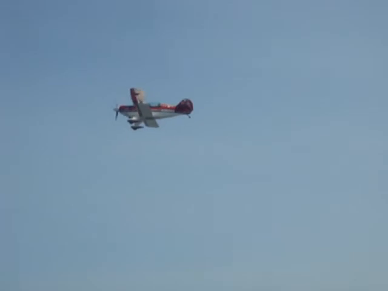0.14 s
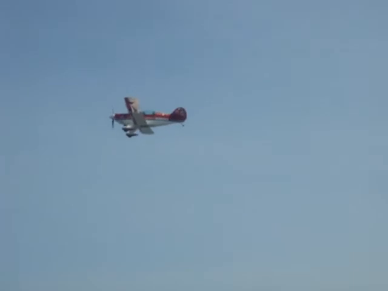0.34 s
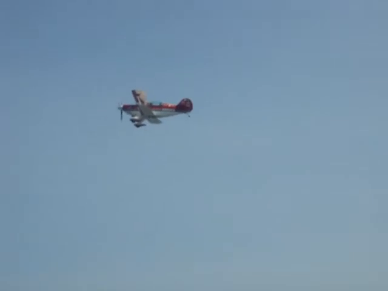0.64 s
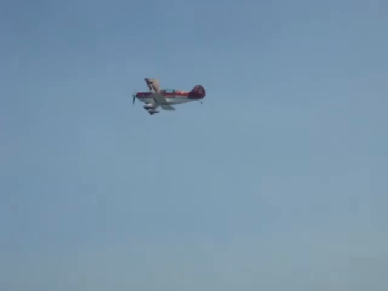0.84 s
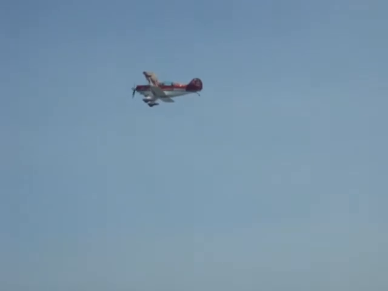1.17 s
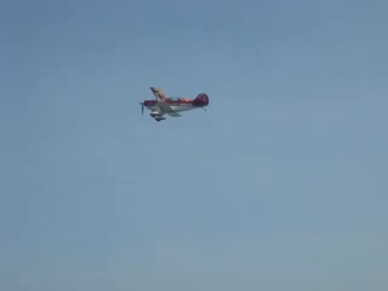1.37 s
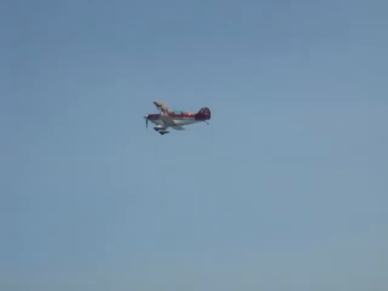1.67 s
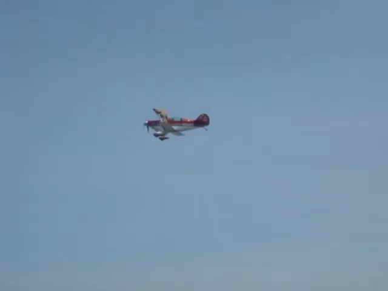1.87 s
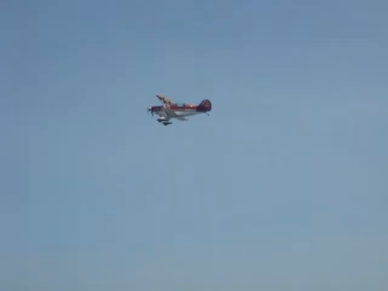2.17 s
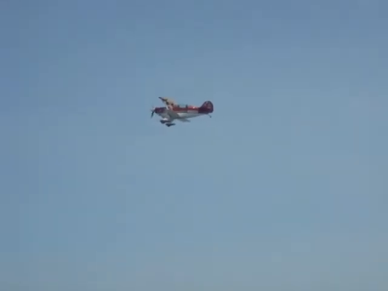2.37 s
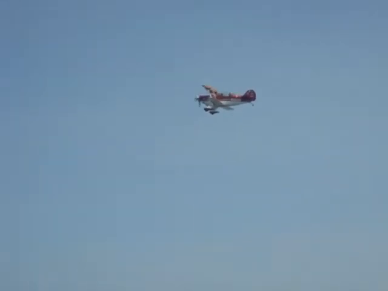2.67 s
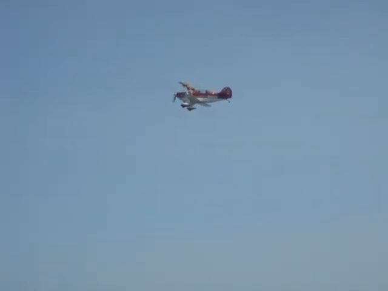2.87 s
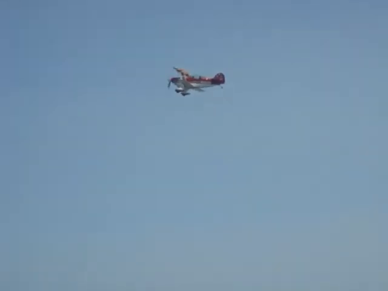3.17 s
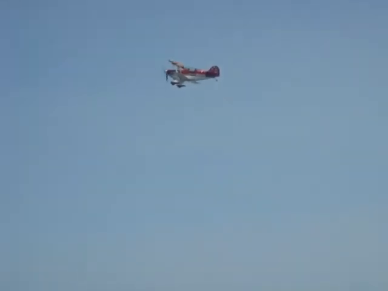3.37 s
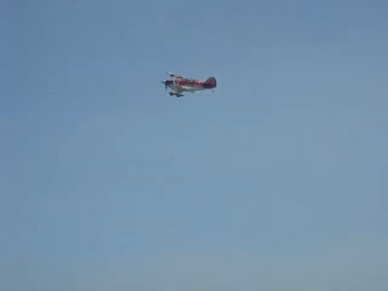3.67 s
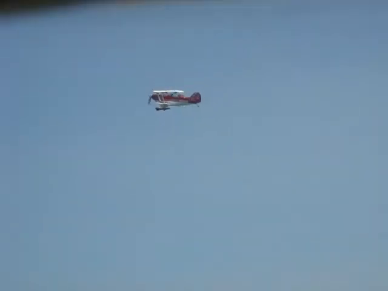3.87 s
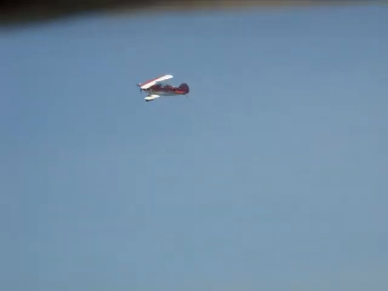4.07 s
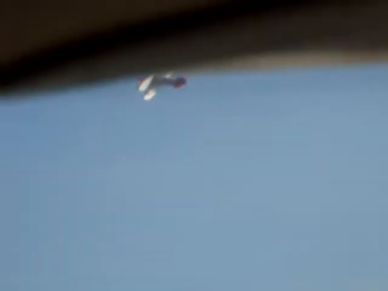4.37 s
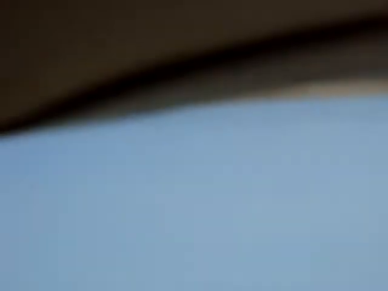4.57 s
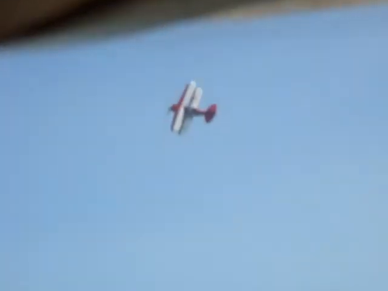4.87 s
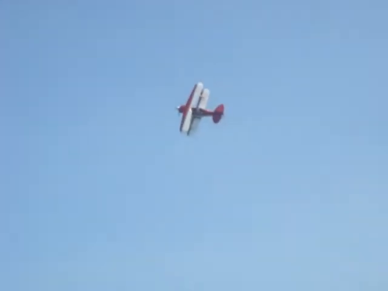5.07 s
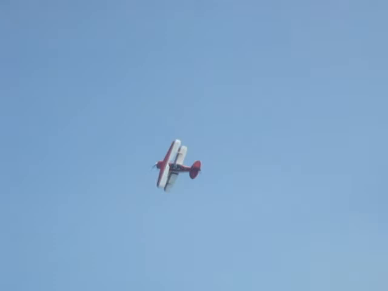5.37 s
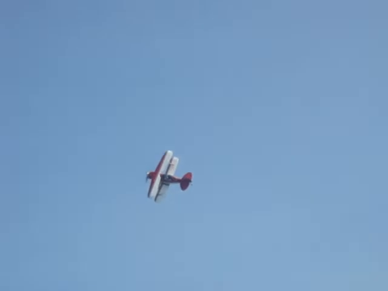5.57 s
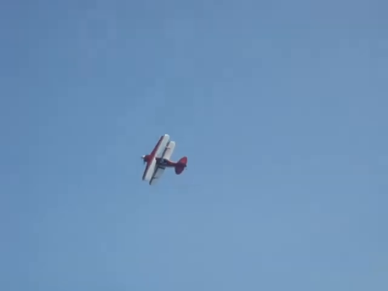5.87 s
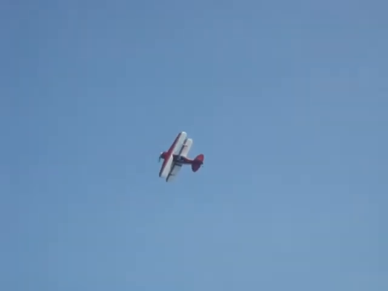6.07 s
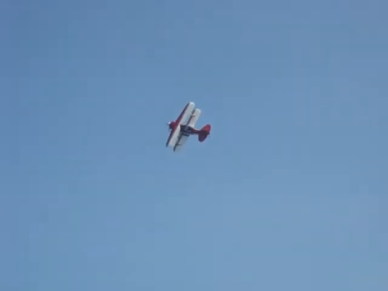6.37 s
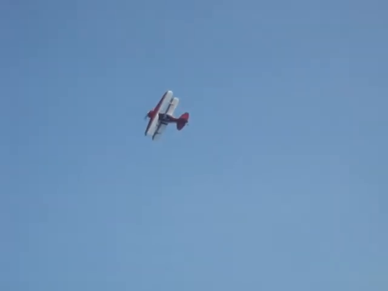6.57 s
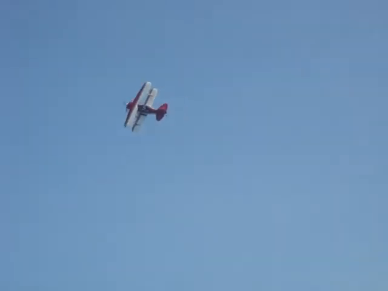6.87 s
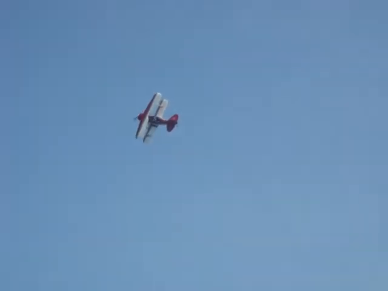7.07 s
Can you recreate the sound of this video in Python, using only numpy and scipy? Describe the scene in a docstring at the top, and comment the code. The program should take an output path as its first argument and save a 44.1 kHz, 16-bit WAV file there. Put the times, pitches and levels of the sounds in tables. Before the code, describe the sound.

Inside a light aircraft, a constant low engine buzz and propeller hum sit beneath loud hissing airflow, unbroken from start to finish.

```python
"""A four-cylinder engine and its propeller drone in the cockpit of a light aircraft in level flight.
The drone is a stack of steady tones tied to the engine speed; a low roar of shaped noise lies under it.
Air rushes loudly over the canopy: brighter noise, faintly pulsed by the propeller blades.
The microphone is moved about under the canopy, and turned after five seconds, which shifts the colour."""
import sys
import numpy as np
from scipy import signal
from scipy.fft import rfft, irfft
from scipy.io import wavfile

SR = 44100
rng = np.random.default_rng(int(sys.argv[2]) if len(sys.argv) > 2 else 0)


def transcribe(signal):
    """Save signal, clipped to [-1, 1], as a 16-bit WAV file at the path in sys.argv[1]."""
    frames = np.atleast_2d(signal).T
    limited = np.clip(frames, -1, 1)
    pcm = np.round(limited * 32767).astype(np.int16)
    wavfile.write(sys.argv[1], SR, pcm)


N = 318825

# the microphone is turned once away from the airflow, quickly at first and then ever more slowly
TURN_AT_S, TURN_SETTLE_S = 5.14, .36


def from_db(db):
    """Turns decibels into a gain."""
    return 10 ** (np.asarray(db) / 20)


def curve(rows, t):
    """Reads a table of (time_s, value) at the times t, joining its points by straight lines."""
    return np.interp(t, *np.transpose(rows))


def spectrum(points, hz):
    """Reads a table of (pitch_hz, level_db), joined by straight lines on a log-frequency axis."""
    point_hz, point_db = np.transpose(points)
    return np.interp(np.log(hz + 1), np.log(point_hz + 1), point_db)


def unit(x):
    """Scales a signal to an rms (average strength) of 1."""
    return x / np.sqrt(np.mean(x ** 2) + 1e-20)


def wander(t, rate_hz):
    """Slow random drift of rms 1, with little movement faster than the rate."""
    grid_s = np.arange(4096) / 400  # 400 points a second
    hz = np.fft.rfftfreq(len(grid_s), grid_s[1])
    noise_spectrum = rfft(rng.standard_normal(len(grid_s)))
    # weaken the fast movement and remove the constant part
    slow = irfft(noise_spectrum / (1 + (hz / rate_hz) ** 4) * (hz > 0))
    return np.interp(t, grid_s, unit(slow))


def shaped_noise(colour):
    """Noise whose level in dB per Hz is colour(hz, s), set in short overlapping slices of time."""
    hz, s, slices = signal.stft(rng.standard_normal(N), SR, nperseg=2048, noverlap=1536)
    # the square root makes 0 dB mean a power of 1 per Hz
    slices = slices * from_db(colour(hz[:, None], s)) * np.sqrt(SR / 2)
    _, noise = signal.istft(slices, SR, nperseg=2048, noverlap=1536)
    return noise[:N]


def bell(x, centre, width):
    """A smooth peak of height 1."""
    return np.exp(-.5 * ((x - centre) / width) ** 2)


def crossover_db(ratio):
    """A steep slope that cuts the level as the ratio passes 1."""
    return -10 * np.log10(1 + ratio ** 16)


def engine_cycles(t, start_firing_hz=86.37, sag_hz_per_s=.07, jitter=.0003):
    """Running count of engine cycles; speed sags very slightly and uneven combustion makes it tremble."""
    firing_hz = start_firing_hz - sag_hz_per_s * t
    cycle_hz = firing_hz / 4  # four firings make one engine cycle
    return np.cumsum(cycle_hz * (1 + jitter * wander(t, rate_hz=6))) / SR


def standing_db(hz, s):
    """Moving through the cockpit's standing waves lifts some bands and lowers others."""
    # place of the microphone across the cockpit: (time_s, place from about -1 to 1)
    mic_place = [(0, -.35), (1.2, -0.73), (3, -0.35), (3.4, .35), (5, 0.23), (5.8, 1)]
    # standing waves of the cockpit: (pitch_hz, width_hz, gain_db per unit of place)
    standing_waves = [(85, 25, -1.5), (345, 25, 1), (550, 50, -0.3), (767, 71, 3)]
    bands_db = sum(db * bell(hz, centre_hz, width_hz) for centre_hz, width_hz, db in standing_waves)
    return curve(mic_place, s) * bands_db


def drone(t, cycles, level_db=0, firing_waver_db=.5, uneven_waver_db=1.3, upper_db=-47, upper_fall_db=0.3):
    """Firing and blade harmonics, with lines between them because the cylinders differ."""
    # exhaust and propeller tones before waver and standing waves: (multiple of cycle rate, level_db rms)
    # every fourth multiple is a firing and blade harmonic
    engine_lines = [(4, -41), (5, -47.2), (6, -44.8), (8, -28.2), (9, -37), (10, -45), (11, -47),
                    (12, -33.6), (13, -39.7), (14, -41.4), (15, -40.7), (16, -33.8), (17, -43.8),
                    (18, -35.6), (19, -46.7), (20, -37.3), (22, -46.8), (23, -46), (24, -35), (25, -41.2),
                    (26, -34.5), (27, -42.4), (28, -40), (29, -46), (30, -43.2), (31, -43), (32, -38),
                    (33, -38), (34, -41.5), (35, -40), (36, -39.5), (37, -35), (39, -45.5), (40, -42.5)]
    # higher crankshaft harmonics sink into the rush
    upper_lines = [(order, upper_db - upper_fall_db * (order - 42)) for order in range(42, 66, 2)]
    tones = np.zeros(N)
    for order, db in engine_lines + upper_lines:
        is_firing = order % 4 == 0
        mean_hz = order * cycles[-1] / t[-1]
        waver_db = (firing_waver_db if is_firing else uneven_waver_db) * wander(t, rate_hz=3.1)
        gain = from_db(db + waver_db + standing_db(mean_hz, t))
        # reflections in the cockpit scatter the phases, smearing the firings into a drone
        random_phase = rng.random()
        tones += gain * np.cos(2 * np.pi * (order * cycles + random_phase))
    return np.sqrt(2) * from_db(level_db) * tones  # the root of 2 turns rms into peak height


def roar(top_hz=950, standing_share=.35, level_db=0):
    """Turbulence and combustion noise booming in the cockpit, feeling the standing waves only in part."""
    # low roar before standing waves and the cut at the top: (pitch_hz, level_db per Hz)
    roar_levels = [(25, -82.4), (60, -78), (90, -63), (120, -57.5), (200, -56), (450, -56.5), (540, -54.5),
                   (650, -55), (820, -53), (950, -56)]

    def colour(hz, s):
        return spectrum(roar_levels, hz) + standing_share * standing_db(hz, s) + crossover_db(hz / top_hz)
    return from_db(level_db) * shaped_noise(colour)


def turned(s):
    """How far the microphone has been turned, 0-1."""
    return 1 - np.exp(-np.maximum(s - TURN_AT_S, 0) / TURN_SETTLE_S)


def hollow_db(hz, s, width_hz=180, sound_m_per_s=343):
    """Peaks of the canopy echo: they slide down as the microphone draws away from the canopy."""
    # distance from the microphone to the canopy: (time_s, gap_m)
    canopy_gap = [(0, 0.1216), (0.4, 0.12), (0.9, 0.1394), (1.5, 0.1477), (2.4, 0.1489), (3.2, 0.1719),
                  (4.85, 0.1739), (5.5, 0.12), (7.23, 0.13)]
    # peaks where the echo off the canopy adds to the rush: (half wavelengths in the gap, boost_db)
    echo_peaks = [(2, 0.76), (3, 2.2), (4, 0.5)]
    spacing_hz = sound_m_per_s / (2 * curve(canopy_gap, s))
    return sum(db * bell(hz, order * spacing_hz, width_hz) for order, db in echo_peaks)


def rush(t, cycles, bottom_hz=950, blade_depth=0.059, buffet_db=0.5, level_db=-.1, turn_loss_db=-0.57):
    """Air over the canopy, coloured by the microphone's place and pulsed by the propeller wash."""
    # basic colour of the air with the microphone facing sideways: (pitch_hz, level_db per Hz)
    side_levels = [(950, -57.5), (1150, -56.5), (1350, -58.5), (1700, -53.5), (1950, -56.5), (2250, -51.5),
                   (3000, -53.5), (4200, -56), (4750, -56.5), (5400, -60.5), (7000, -64.0), (7800, -64.5),
                   (8700, -63), (9900, -65.3)]
    # basic colour once it is turned, before the turn's loss: (pitch_hz, level_db per Hz)
    turned_levels = [(950, -57), (1500, -57.5), (1750, -56.6), (1950, -56.5), (2250, -53), (2800, -49.5),
                     (3600, -53), (4150, -54), (4900, -56.5), (5300, -59), (6000, -64), (6700, -63.5),
                     (8400, -67), (9900, -67)]

    def colour(hz, s):
        turn = turned(s)
        side_db = spectrum(side_levels, hz)
        turned_db = spectrum(turned_levels, hz) + turn_loss_db
        facing_db = (1 - turn) * side_db + turn * turned_db
        # the middle of the rush swells briefly around the start of the turn
        swell_db = 2.2 * bell(s, TURN_AT_S, width=.13) * bell(hz, 2600, width=450)
        return facing_db + hollow_db(hz, s) + swell_db + crossover_db(bottom_hz / (hz + 1))
    # two blades and two shaft turns: four passes in each engine cycle
    blades = np.cos(2 * np.pi * 4 * cycles)
    flow_db = level_db + buffet_db * wander(t, rate_hz=23)
    return shaped_noise(colour) * from_db(flow_db) * (1 + blade_depth * blades)


def scene():
    """Engine and air at one microphone, alike in both channels."""
    t = np.arange(N) / SR
    cycles = engine_cycles(t)
    cockpit = drone(t, cycles) + roar() + rush(t, cycles)
    return np.array([cockpit, cockpit])


def record(dry, edge_hz=10030):
    """A small camera's steep band limit: a long filter that removes the treble above the edge."""
    taps = signal.firwin(1023, edge_hz, window=("kaiser", 9), fs=SR)
    return signal.oaconvolve(dry, taps[None], "same")


dry = scene()
out = record(dry)
transcribe(out)
```